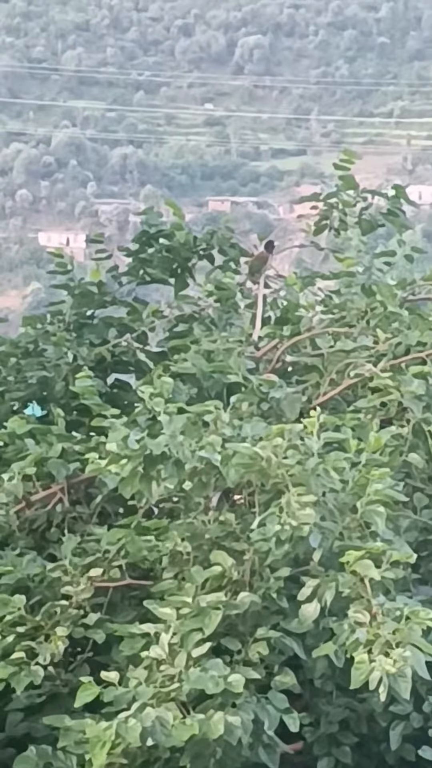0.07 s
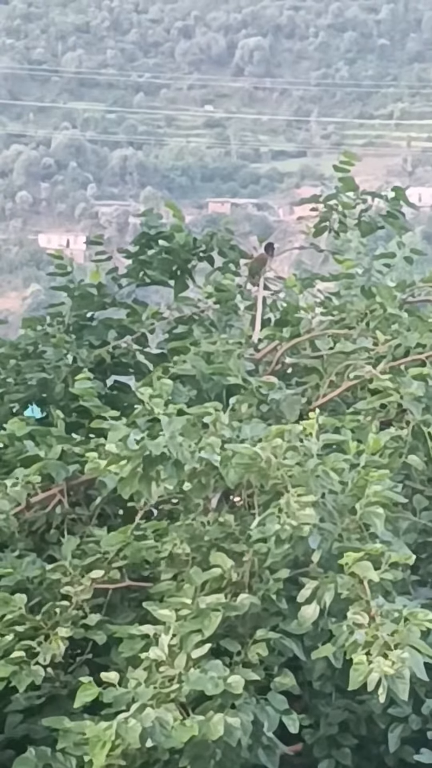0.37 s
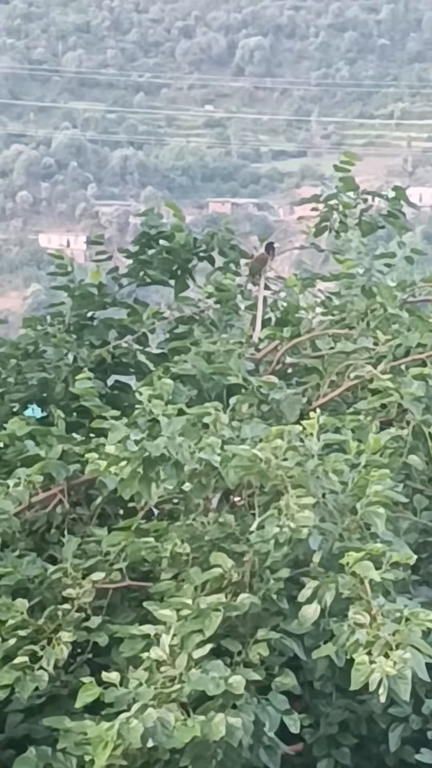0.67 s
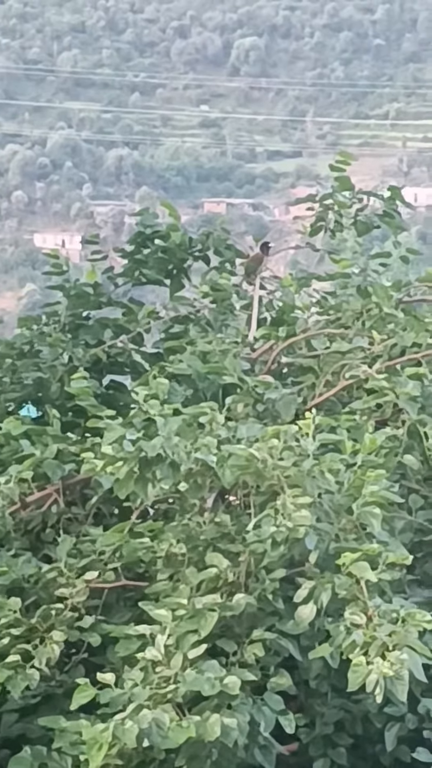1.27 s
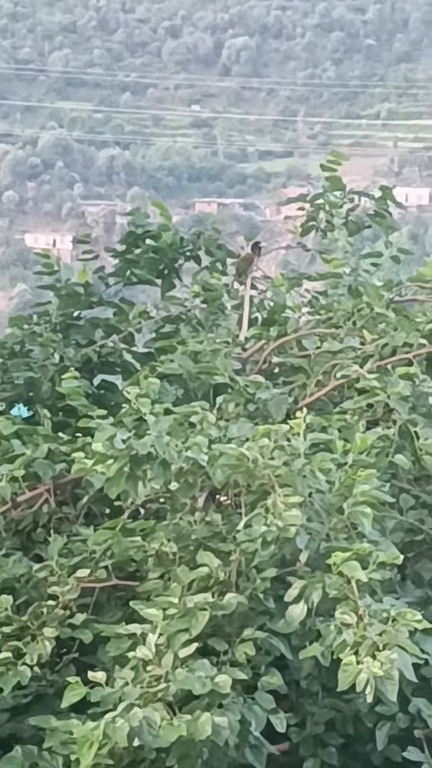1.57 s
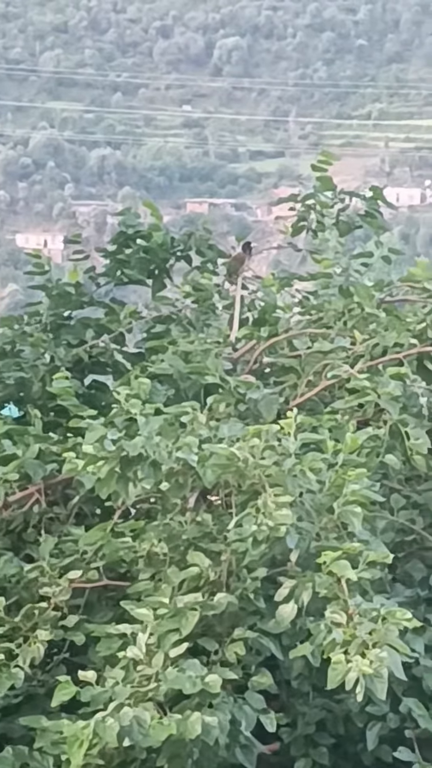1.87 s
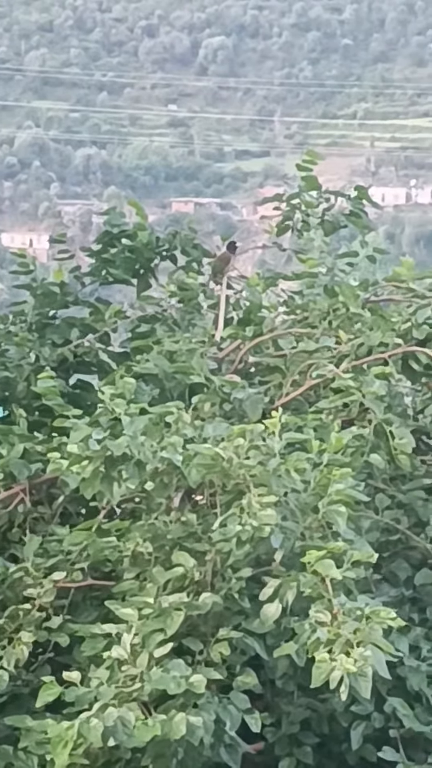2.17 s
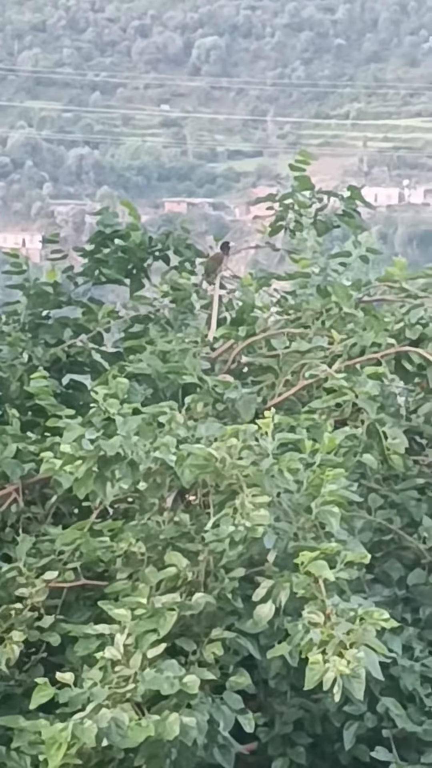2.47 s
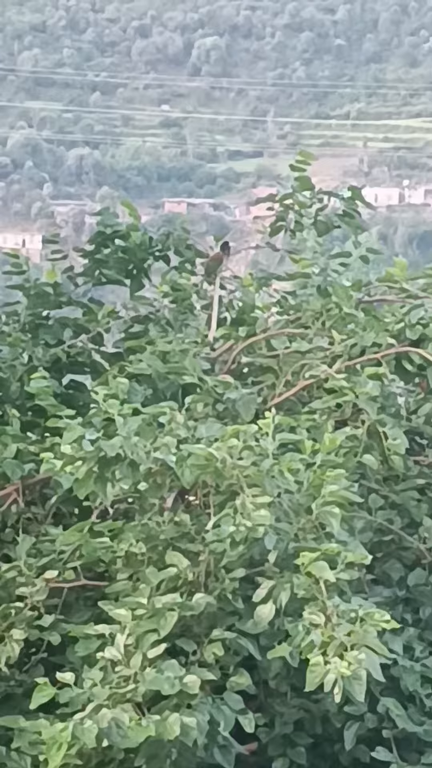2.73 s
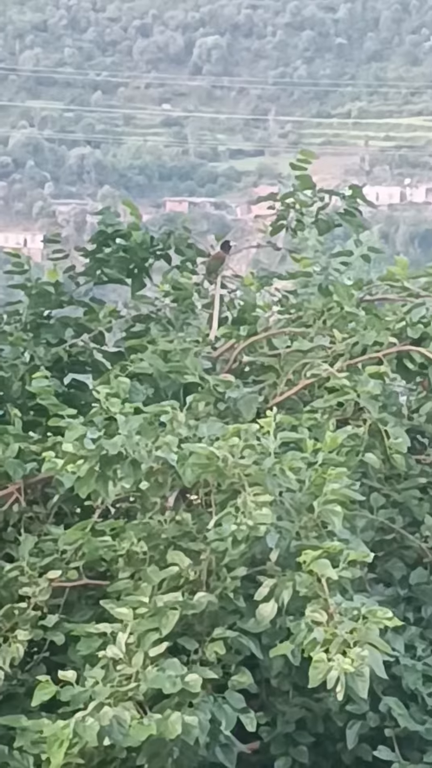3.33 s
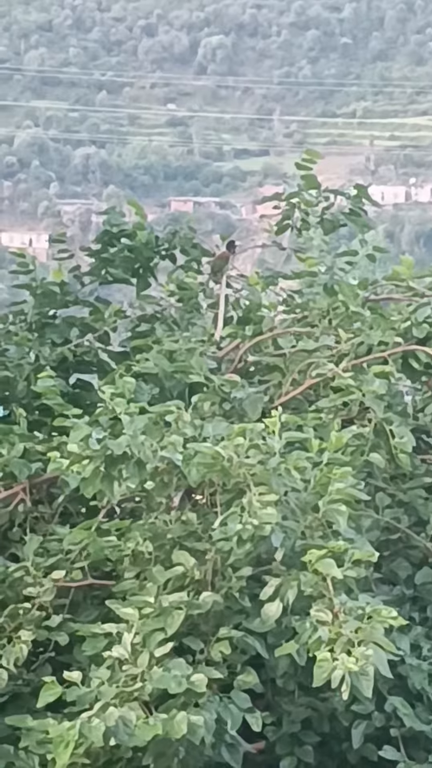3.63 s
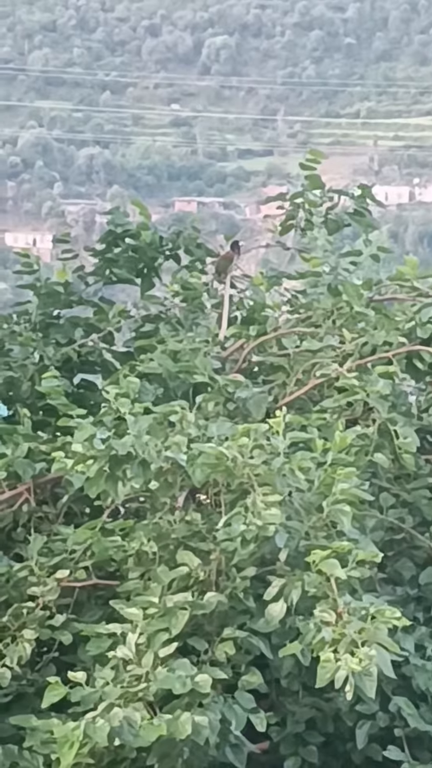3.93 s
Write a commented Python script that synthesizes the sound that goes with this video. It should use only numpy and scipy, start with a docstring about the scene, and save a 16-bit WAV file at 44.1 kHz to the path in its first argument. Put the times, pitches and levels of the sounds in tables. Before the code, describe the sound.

A bird in a treetop gives four drawn-out, falling nasal whistles at about 0.2, 1.3, 2.4 and 3.6 seconds, each just over half a second long with a faint hillside echo. Small birds chirp throughout, with quick rising whistles near 1.9 and 2.8 seconds. Leaves rustle briefly now and then. Underneath are a soft steady hiss, a low valley rumble and faint, distant animal cries.

```python
"""A low valley rumble and soft hiss come first, with a distant engine dying away and a far animal cry.
Then a treetop bird gives a drawn-out, falling, nasal whistle four times, its overtones shaped by
throat and beak. Small birds chirp in the trees around the microphone, leaves rustle, and a nearer
bird whistles upward twice. The foliage scatters every voice; the treetop calls and the cries
from down the valley also echo off the hillside."""
import sys
import numpy as np
from scipy import signal
from scipy.fft import rfft, irfft
from scipy.io import wavfile
from scipy.ndimage import uniform_filter1d

SR = 44100
rng = np.random.default_rng(int(sys.argv[2]) if len(sys.argv) > 2 else 0)


def bounce(signal):
    """Save signal as a 16-bit WAV file at the path given by the first command-line argument."""
    frames = np.transpose(np.atleast_2d(signal))
    limited = np.clip(frames, -1, 1)
    pcm = np.round(limited * 32767).astype(np.int16)
    wavfile.write(sys.argv[1], SR, pcm)


N = 176400
TIME = np.arange(N) / SR


def undb(db):
    return 10 ** (np.asarray(db) / 20)


def curve(x, rows):
    """Straight lines through the rows."""
    return np.interp(x, *np.array(rows, float).T)


def gain_at(hz, rows):
    """Gain of a (Hz, dB) table on a log-frequency axis."""
    f, db = np.array(rows, float).T
    return undb(np.interp(np.log(np.maximum(hz, 1)), np.log(f), db))


def colour(x, rows):
    """Filter by a (Hz, dB) table."""
    return irfft(rfft(x) * gain_at(np.fft.rfftfreq(N, 1 / SR), rows), N)


def unit(x):
    return x / np.sqrt(np.mean(x ** 2))


def walk(rate):
    """Smooth random wander of spread 1."""
    k = max(int(SR / rate), 1)
    steps = np.repeat(rng.standard_normal(N)[:N // k + 1], k)
    return unit(uniform_filter1d(steps, k)[:N])


def pan(db):
    """Stereo gains, the left louder than the right by db."""
    return undb(np.array([[db], [-db]]) / 2)


def gate(t, length, attack, release):
    """Attack, hold, release."""
    return np.clip(t / attack, 0, 1) * np.clip((length - t) / release, 0, 1)


def span(start, length):
    """Sample numbers of an event and the time since its start."""
    i = np.arange(max(int(start * SR), 0), min(int((start + length) * SR), N))
    return i, i / SR - start


def phase_of(hz):
    return 2 * np.pi * np.cumsum(hz) / SR


def noise(rows, width):
    """Coloured stereo noise of RMS 1."""
    mid, side = rng.standard_normal((2, N))
    return unit(colour(mid + width * side * np.array([[1], [-1]]), rows))


def reflect(x, decay):
    """Dense stereo reflections that follow a decay envelope."""
    echo = rng.standard_normal((2, SR)) * decay / np.sqrt(np.sum(decay ** 2))
    return signal.fftconvolve(x[None], echo, axes=1)[:, :N]


def trees(x, scatter_t60_s=0.06, tail_t60_s=0.9, tail_db=-17):
    """Quick scatter from the foliage and a faint long tail from the hillside."""
    t = TIME[:SR]
    decay = undb(-60 * t / scatter_t60_s) + undb(tail_db - 60 * t / tail_t60_s)
    return reflect(x, decay * np.minimum(t / 0.012, 1))


def hillside(x, t60_s=0.95, build_s=0.074):
    """A late, diffuse echo from the slope."""
    t = TIME[:SR]
    return reflect(x, undb(-60 * t / t60_s) * np.minimum(t / build_s, 1) ** 2)


# Spectrum of the valley's rumble (frequency [Hz], relative level [dB])
RUMBLE_SPECTRUM = [(29, -49), (50, -17), (82, -6), (145, 2), (238, -5), (265, -7), (330, -6.5), (562, -9),
                   (788, -15), (900, -25.5), (1170, -73), (1980, -120)]
# Its slow drift at the microphone (time [s], gain [dB])
RUMBLE_SWELL = [(0, 2), (.4, 0.5), (1, 0), (2.5, -2), (4, -0.5)]

def valley_rumble(level_db=-55.5):
    """Low noise from the valley, nearly centred, easing and returning."""
    floor = [(1500, -43)]  # flat and faint above 1500 Hz
    rumble = noise(list(RUMBLE_SPECTRUM) + floor, width=0.2)
    return rumble * undb(level_db + curve(TIME, RUMBLE_SWELL))


# Hiss all around the microphone (frequency [Hz], relative level [dB])
AIR_SPECTRUM = [(500, -14), (900, -2.5), (1500, 5), (2100, -1.5), (3300, 1), (4500, -4.5), (5600, -2.5),
                (7200, -4.5), (10000, -6), (16000, -8)]

def air_hiss():
    """Soft, steady, wide noise of the open air."""
    return noise(AIR_SPECTRUM, width=0.92) * undb(-49)


# Tones of an engine a long way off (frequency [Hz], starting level [dB])
ENGINE_TONES = [(66, -68.5), (122, -61), (205, -59.5), (236, -57.5)]

def distant_engine(fade_s=0.4, waver=0.0099):
    """A drone of low, wavering tones that dies away."""
    drone = sum(undb(db) * np.sin(phase_of(hz * (1 + waver * walk(19)))) for hz, db in ENGINE_TONES)
    return np.sqrt(2) * drone * np.exp(-(TIME / fade_s) ** 2)


# Animals far down the valley (start [s], length [s], pitch [Hz], throat resonance [Hz], level [dB])
CRIES = [(0, 0.24, 486.7, 1450, -48), (.52, 0.24, 293.8, 1430, -46.5), (0.999, 0.16, 381, 1520, -52),
         (2.2, 0.24, 377.4, 1460, -53.5), (2.736, 0.266, 339.1, 1070, -51.5), (3.273, 0.17, 330, 1220, -55),
         (3.468, 0.24, 343.5, 1240, -47)]

def far_cries(arch=0.0686, hoarseness=0.0345, half_width_hz=183, skirt_db=-25):
    """Hoarse arched cries through one throat resonance; only their echoes reach the microphone."""
    out, rough = np.zeros(N), walk(200)
    for start, length, pitch, throat_hz, db in CRIES:
        i, t = span(start, length)
        hz = pitch * (1 - arch * (2 * t / length - 1) ** 2 + hoarseness * rough[i])
        voice = np.zeros(len(i))
        for k in range(1, 8):
            resonance = 1 / (1 + ((k * hz - throat_hz) / half_width_hz) ** 2)
            voice += (resonance + undb(skirt_db)) * np.sin(k * phase_of(hz))
        out[i] += undb(db) * unit(voice) * gate(t, length, attack=0.0082, release=0.063)
    return trees(out) + undb(-3.5) * hillside(out)


# Voices of the birds farther off in the wood (centre pitch [Hz])
CHATTER_VOICES = [2007, 2750, 3336, 3600, 4660, 6940]

def far_chatter(notes_per_s=45, note_s=0.06, spread=0.14, level_db=-50.5):
    """Many faint gliding notes at random times, heard only through the trees."""
    out, rasp = np.zeros(N), walk(452.1)
    for when, voice, detune, glide, size in rng.random((int(notes_per_s * N / SR), 5)):
        i, t = span(when * N / SR, note_s)
        centre_hz = CHATTER_VOICES[int(voice * len(CHATTER_VOICES))]
        bend = 2 * detune - 1 + (2 * glide - 1) * t / note_s
        hz = centre_hz * (1 + spread * bend) * (1 + 0.013 * rasp[i])
        out[i] += (.5 + size) * np.sin(np.pi * t / note_s) * np.sin(phase_of(hz))
    return undb(level_db) * trees(unit(out))


# Small birds' chirps around the microphone, plus the treetop call's sixth harmonic ringing
# near 6.4 kHz as three calls end (the rows at 0.734, 1.846 and 2.967 s)
# (start [s], length [s], first pitch [Hz], middle pitch [Hz], last pitch [Hz], level [dB], rasp [0-1])
SHORT_NOTES = [ (0.079, 0.098, 3500, 3860, 3270, -51, 0.7), (0.099, 0.09, 4900, 4660, 4520, -55.5, 0.26),
               (0.18, 0.037, 2900, 2664, 2720, -48, 0.7), (.41, 0.091, 4587, 4614, 4460, -45.5, 0.7),
               (0.734, 0.058, 6640, 6450, 6400, -45.5, 0.23), (0.741, .06, 5080, 5023, 5000, -46.5, 0.1),
               (0.776, 0.075, 7190, 7430, 7120, -46.5, 0.53), (0.791, 0.054, 3560, 3585, 3320, -48, 1),
               (0.956, 0.085, 3800, 3850, 3430, -56.5, 0.55), (1.21, 0.061, 2786, 2553, 2530, -49.5, .4),
               (1.239, 0.11, 4860, 4725, 4660, -49.5, 0.6), (1.312, 0.27, 2156, 2234, 2190, -53, 0.16),
               (1.391, 0.052, 2500, 2970, 3060, -45.5, 0.47), (1.7, 0.051, 3080, 3094, 3220, -40.5, 0.47),
               (1.828, 0.044, 2677, 2810, 2740, -45.5, 0.37), (1.846, 0.054, 6640, 6480, 6270, -49.5, 0.07),
               (1.933, 0.033, 5570, 5700, 5600, -53, 0.05), (2.029, 0.017, 4840, 3670, 3830, -53, 0.5),
               (2.038, 0.018, 2850, 3390, 3150, -43, 0), (2.08, 0.12, 6600, 6560, 6520, -59, 0),
               (2.147, 0.087, 4660, 4510, 3750, -47, 0.77), (2.228, 0.12, 3506, 3077, 2935, -45, 0.22),
               (2.233, 0.11, 3860, 3770, 3540, -47, 0.61), (2.582, 0.063, 3027, 3354, 3200, -44, 0.3),
               (2.724, 0.069, 2484, 2920, 2570, -49.5, 0.19), (2.914, 0.054, 4600, 3940, 3400, -50.5, 0.9),
               (2.967, 0.14, 6260, 6540, 6490, -48, 0.2), (3.054, 0.055, 3250, 3990, 3860, -44.5, 0.29),
               (3.05, 0.039, 6660, 7540, 8160, -48.5, 0.56), (3.14, 0.097, 4790, 4795, 4920, -47, 0.45),
               (3.226, 0.094, 3500, 3405, 3180, -47.5, 0.66), (3.446, 0.14, 2010, 2090, 1960, -56.5, 0.02),
               (3.479, 0.057, 7130, 7130, 7260, -49, 0.33), (3.505, 0.04, 3307, 3570, 3600, -48, 0.17),
               (3.844, 0.056, 2850, 3776, 4130, -50, 0.48), (3.881, .13, 3600, 3165, 3576, -46.5, 0.47),
               (3.901, 0.14, 3830, 3790, 3810, -51.5, 0.08)]

def chirps_and_ringing(rasp_depth=0.0652, edge_s=0.0074):
    """Small birds' chirps and the call's ringing overtone; the raspier a note, the more it scatters."""
    near, far, wobble = np.zeros(N), np.zeros(N), walk(452.1)
    for start, length, first, middle, last, db, rasp in SHORT_NOTES:
        i, t = span(start, length)
        arch = np.polyfit([0, .5, 1], [first, middle, last], 2)
        hz = np.polyval(arch, t / length) * (1 + rasp_depth * rasp * wobble[i])
        note = np.sqrt(2) * undb(db) * gate(t, length, edge_s, edge_s) * np.sin(phase_of(hz))
        near[i] += note * (1 - rasp)
        far[i] += note * np.sqrt(.5 + rasp)
    return undb(-2.5) * near + undb(0.5) * trees(far)


# Long calls from the treetop (start [s], length [s], level [dB])
CALLS = [(0.211, 0.61, -46.5), (1.322, 0.6, -46), (2.443, .595, -47.5), (3.572, .6, -47)]
# Each call flicks up, holds and sinks (share of the call [0-1], pitch [Hz])
CALL_PITCH = [(0, 1130), (.035, 1270), (.07, 1238), (.11, 1246), (.15, 1215), (.22, 1220), (.36, 1228),
              (.45, 1220), (.62, 1160), (.88, 1129), (1, 1003)]
# The swells and dips heard in each call at the microphone (share of the call [0-1], gain [dB])
CALL_LEVEL = [(0, 8.5), (.08, 2), (.2, -3.5), (.36, 1.5), (.6, -1), (.73, 1), (1, -4)]
# Resonances of the bird's throat and beak (frequency [Hz], gain [dB])
THROAT = [(1000, -5), (1230, 3.5), (2400, -22), (3650, -21), (4500, -19), (4900, -4.5), (5250, -5),
          (5700, -9.5), (6150, -8), (6800, -16), (7350, -14.5), (8100, -19), (9800, -12), (11000, -22),
          (12500, -19), (15000, -53)]

def treetop_bird(jitter_depth=0.0027, rough_depth=0.03, edge_s=0.028, sag_db=-2, brighten_db=0.67):
    """A fluttering whistle whose overtones slide through the throat's resonances."""
    fundamental, overtones = np.zeros((2, N))
    jitter, rough = walk(150), walk(500)
    flutters = [undb(2.6 * walk(70)) for _ in range(13)]  # one per harmonic
    for start, length, db in CALLS:
        i, t = span(start, length)
        share = t / length
        edges = np.exp(-t / edge_s) + np.exp((t - length) / edge_s)  # rough as it starts and stops
        hz = curve(share, CALL_PITCH) * (1 + jitter_depth * jitter[i] + rough_depth * edges * rough[i])
        level = undb(db + curve(share, CALL_LEVEL) + sag_db * share ** 2)
        envelope = np.sqrt(2) * level * gate(t, length, attack=0.026, release=0.017)
        tilt = undb(brighten_db * (share - .5))  # higher overtones gain as the call goes on
        partials = [tilt ** (k - 1) * flutter[i] * gain_at(k * hz, THROAT) * np.sin(k * phase_of(hz))
                    for k, flutter in enumerate(flutters, 1)]
        fundamental[i] += envelope * partials[0]
        overtones[i] += envelope * sum(partials[1:]) * gate(t, length, attack=0.045, release=0.15)
    direct = fundamental * pan(db=-3.5) + overtones * pan(db=12.5)
    scatter = trees(undb(-11) * fundamental + undb(2) * overtones)
    return direct + scatter + undb(-9) * hillside(fundamental)  # the fundamental lingers on the slope


# Stirs in the leaves on both sides of the microphone (peak time [s], half length [s], level [dB])
RUSTLES = [(0.503, 0.16, -48), (1.053, 0.062, -48), (1.664, 0.068, -44), (2.242, 0.18, -47),
           (2.64, 0.043, -47), (3.922, 0.054, -45.5)]
# Spectrum of the leaves (frequency [Hz], relative level [dB])
LEAF_SPECTRUM = [(800, -25), (1800, 9.5), (3700, 19), (5500, 13), (7500, 15.5), (10000, 9.5),
                 (16000, -51.5)]

def leaves():
    """Leaves rustle in brief, smooth swells of bright noise."""
    stir = sum(undb(db) * np.exp(-((TIME - peak) / half) ** 2) for peak, half, db in RUSTLES)
    return noise(LEAF_SPECTRUM, width=0.92) * stir


# Two whistles close by, left of the microphone (start [s], level the swell heads for [dB])
UPSLURS = [(1.925, -46.5), (2.826, -50)]
# Their upward sweep (time into the note [s], pitch [Hz])
UPSLUR_PITCH = [(0, 3327), (.025, 3680), (.047, 3850), (.066, 4700), (.081, 5220), (.09, 5230),
                (.103, 4970)]

def near_bird(swell_s=0.28, octave_db=-9):
    """A pure rising whistle with a softer octave, breaking off while it still swells."""
    out, length = np.zeros(N), UPSLUR_PITCH[-1][0]
    for start, db in UPSLURS:
        i, t = span(start, length)
        phase = phase_of(curve(t, UPSLUR_PITCH))
        envelope = undb(db) * np.sqrt(2 * gate(t, length, swell_s, release=0.0069))
        out[i] += envelope * (np.sin(phase) + undb(octave_db) * np.sin(2 * phase))
    return out * pan(db=6) + undb(-13) * trees(out)


def scene():
    """Everything that reaches a stereo microphone among the trees."""
    voices = treetop_bird() + chirps_and_ringing() + near_bird() + far_cries()
    return voices + valley_rumble() + distant_engine() + air_hiss() + leaves() + far_chatter()


# Response of the microphone (frequency [Hz], gain [dB])
MIC_RESPONSE = [(45, -25), (56, -20), (63, 1), (8300, 1), (8800, -22.5), (16000, -13)]

def record(dry, top_hz=15750):
    """The microphone drops the deep bass and the high treble, then the top is cut."""
    lowpass = signal.ellip(10, .1, 70, top_hz, fs=SR, output="sos")
    return signal.sosfilt(lowpass, colour(dry, MIC_RESPONSE))


dry = scene()
out = record(dry)
bounce(out)
```